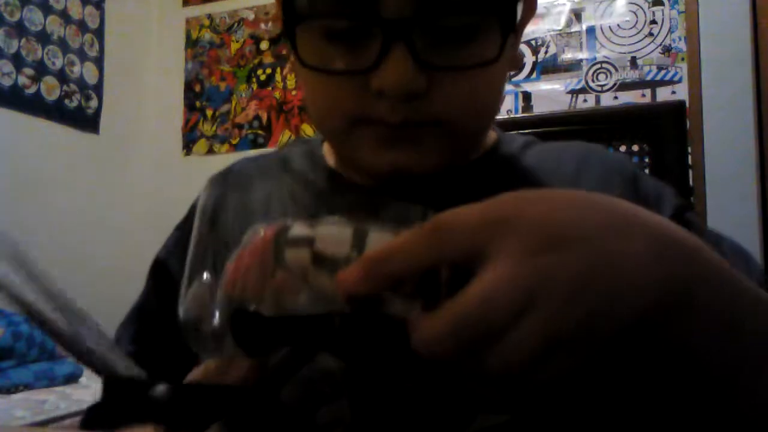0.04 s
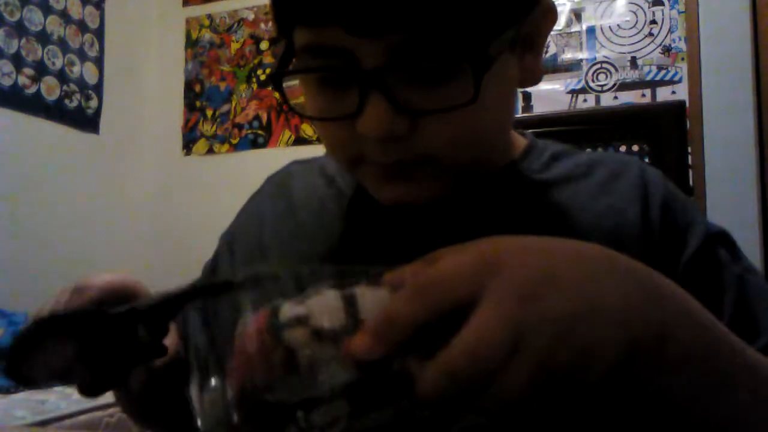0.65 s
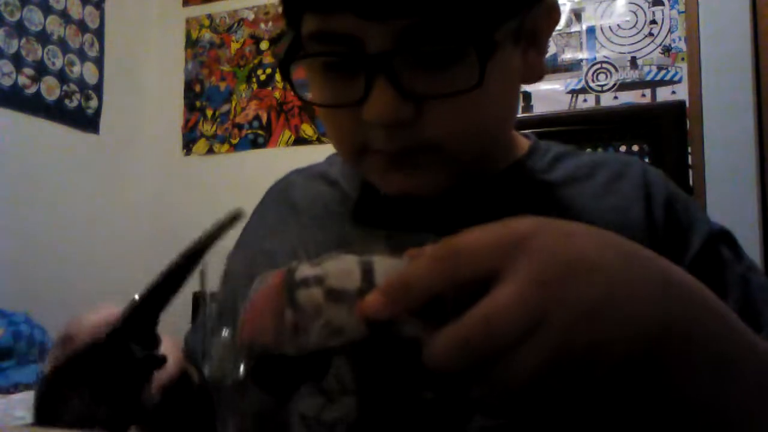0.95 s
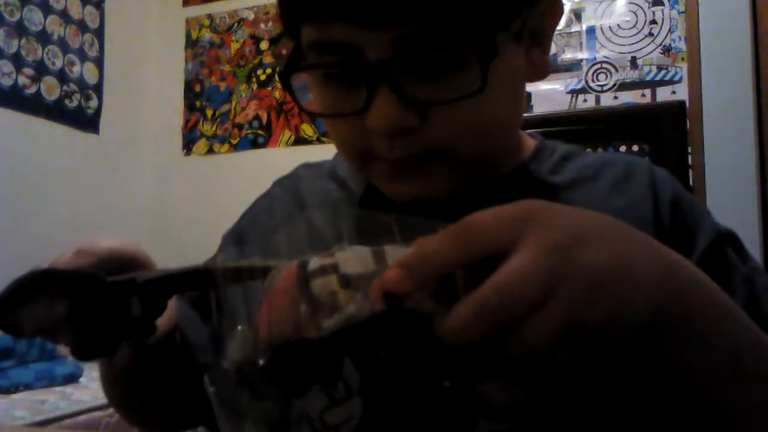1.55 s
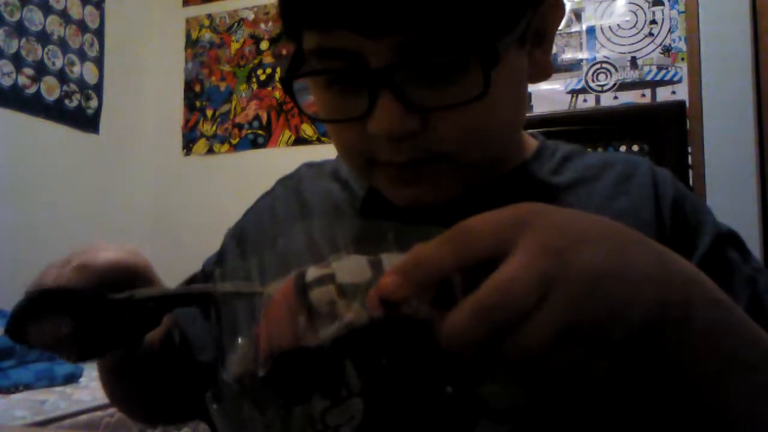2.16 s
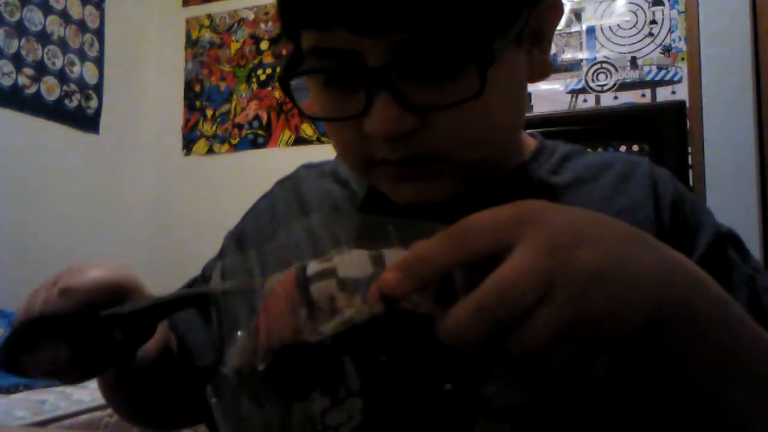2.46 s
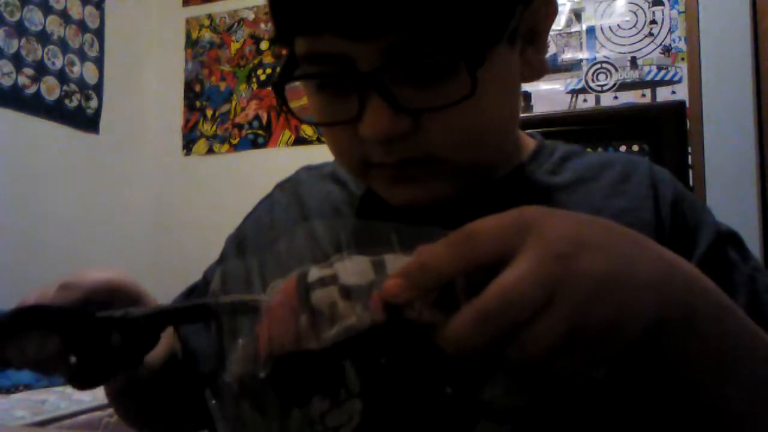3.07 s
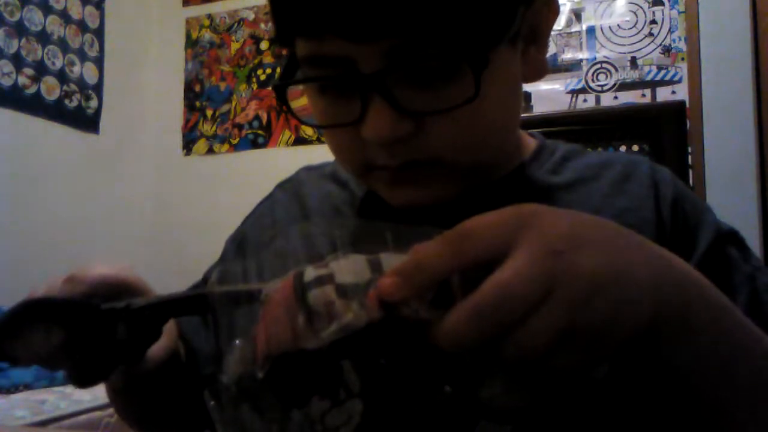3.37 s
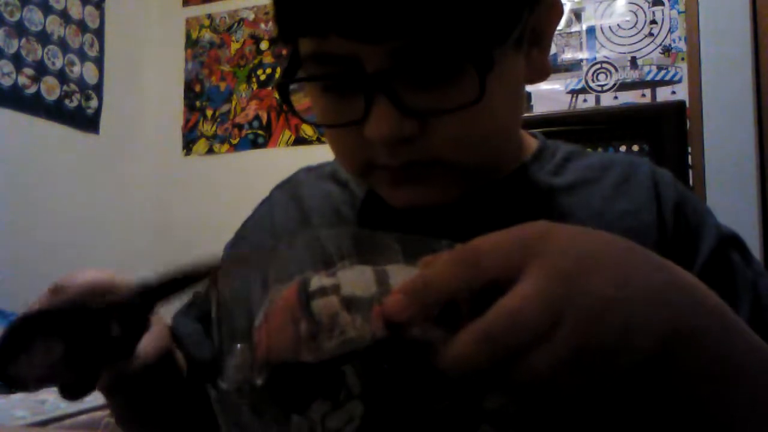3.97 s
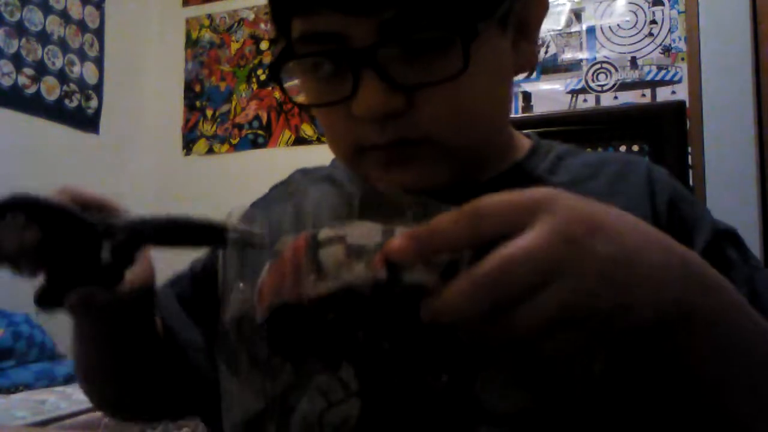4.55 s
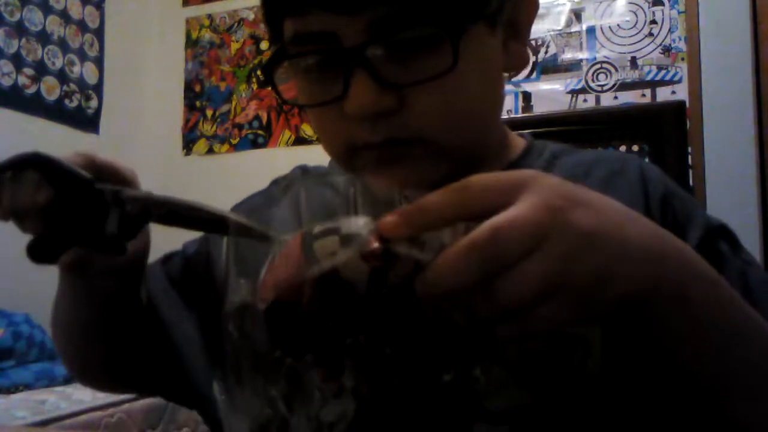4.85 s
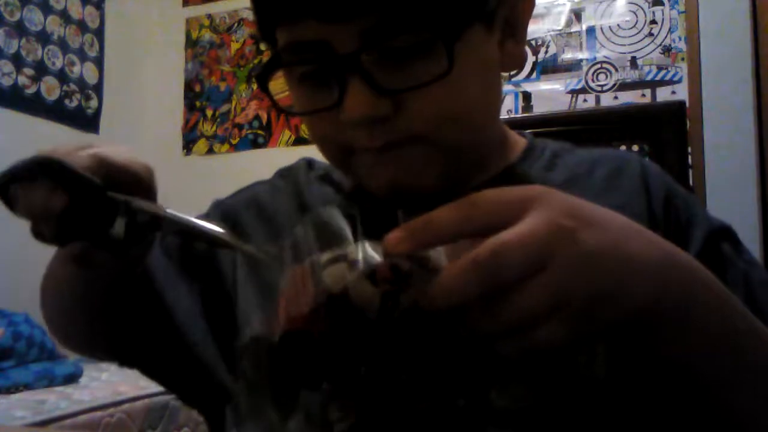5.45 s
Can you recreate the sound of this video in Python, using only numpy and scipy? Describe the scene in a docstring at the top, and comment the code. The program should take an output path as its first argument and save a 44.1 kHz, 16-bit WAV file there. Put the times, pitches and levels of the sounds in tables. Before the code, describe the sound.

Stiff plastic packaging clicks, rubs and crackles up close as scissors cut in, the blades ringing briefly before it cracks loudly.

```python
"""A stiff clear plastic pack is worked open with scissors, close to a laptop microphone in a small bedroom.
The shell buckles in short irregular clicks, rubs under the fingers and finally gives with a loud crack;
the steel blades ring as they knock. The near walls add a short echo. A low mains hum wavers underneath,
and a noise suppressor hushes the pauses."""
import sys
import numpy as np
from scipy import signal
from scipy.fft import rfft, irfft
from scipy.io import wavfile
from scipy.ndimage import uniform_filter1d

SR = 44100
rng = np.random.default_rng(int(sys.argv[2]) if len(sys.argv) > 2 else 0)


def file_out(sig):
    """Save sig as 16-bit WAV at sys.argv[1]."""
    # one column per channel
    cols = np.atleast_2d(sig).T
    # limit, then scale
    lim = np.clip(cols, -1, 1)
    pcm = np.round(lim * 32767).astype(np.int16)
    wavfile.write(sys.argv[1], SR, pcm)


N = 247571
T = np.arange(N) / SR


def undb(db):
    """Decibels to gain."""
    return 10 ** (np.asarray(db) / 20)


def unit(x, size=None):
    """Scale to rms 1 over the first size samples, or over all of x."""
    return x / np.sqrt(np.mean(x[:size] ** 2) + 1e-20)


def add(out, s, x):
    """Mix x in at time s."""
    i = max(int(s * SR), 0)
    out[i:i + len(x)] += x[:max(N - i, 0)]


def along(points, hz):
    """Read (f/Hz, value) points on a log-frequency axis."""
    f, value = np.transpose(points)
    return np.interp(np.log(hz + 1), np.log(f), value)


def colour(x, points):
    """Filter x by a curve of (f/Hz, level/dB) points."""
    hz = np.fft.rfftfreq(len(x), 1 / SR)
    return irfft(rfft(x) * undb(along(points, hz)), len(x))


def resonate(x, hz, width):
    """One resonance, gain 1 at its centre."""
    hz = min(hz, .45 * SR)
    return signal.lfilter(*signal.iirpeak(hz, hz / width, fs=SR), x)


def waver(rate_hz):
    """Random steps, smoothed twice, at rms 1."""
    hold = int(SR / rate_hz)
    steps = np.repeat(rng.standard_normal(N // hold + 1), hold)
    return unit(uniform_filter1d(uniform_filter1d(steps, hold), hold)[:N])


# mains partials, rumble spectrum and hiss spectrum: f/Hz, relative level/dB
HUM = [(59.5, 1.5), (119.5, -4)]
RUMBLE = [(25, -14.5), (58, 0), (100, -6.5), (170, -15), (270, -7), (450, -18), (800, -17.5), (1500, -31.5),
          (4000, -37.5)]
HISS = [(200, 2), (1000, 7), (2500, 5), (5000, -3), (8000, 3.5), (11000, 5.5), (16000, -12.5)]
# fader on the room tone, sinking in the pauses: t/s, level/dB
ROOM_TONE_FADER = [(0, -60), (.8, -60), (.9, -78), (.95, -63.5), (1.07, -64.5), (1.15, -58.5), (1.32, -57),
                   (1.4, -74.5), (1.48, -58), (1.8, -64), (1.9, -81), (1.97, -64), (2.06, -62.5),
                   (2.18, -78.5), (2.25, -59.5), (2.52, -59.5), (2.7, -65.5), (2.95, -58.5), (3.28, -62.5),
                   (3.5, -59), (4.15, -58), (4.26, -63), (4.33, -57)]
def room_tone(hum_db=-7.5, rumble_db=-4.5, hiss_db=-16.5, waver_db=2):
    """Behind the pack, mains hum, rumble and faint hiss swell and sink together; the lows also waver."""
    hum = unit(sum(undb(db) * np.sin(2 * np.pi * (hz * T + rng.random())) for hz, db in HUM))
    rumble = unit(colour(rng.standard_normal(N), RUMBLE))
    hiss = unit(colour(rng.standard_normal(N), HISS))
    lows = (undb(hum_db) * hum + undb(rumble_db) * rumble) * undb(waver_db * waver(rate_hz=16))
    fader_db = np.interp(T, *np.transpose(ROOM_TONE_FADER))
    return (lows + undb(hiss_db) * hiss) * undb(fader_db)


# decay of the bedroom: f/Hz, t60/s
ROOM_T60 = [(200, 0.17), (530, 0.36), (1400, 0.2545), (3700, 0.29), (9700, 0.24), (16000, 0.37)]
# echo against the direct sound at the microphone: f/Hz, level/dB
ECHO_LEVEL = [(100, 1.5), (400, -7), (1000, -5.5), (2000, -2.5), (3700, -10.5), (7000, -5), (10000, -5),
              (16000, -11)]
def bedroom(x, gap_s=0.0056, build_s=0.00097):
    """The near walls answer a few milliseconds late with a short dense tail."""
    t = T[:SR * 3 // 5]
    age = np.maximum(t - gap_s, 0)
    spectrum = rfft(rng.standard_normal(len(t)))
    hz = np.fft.rfftfreq(len(t), 1 / SR)
    edges = np.geomspace(60, 18000, 13)
    tail = 0
    for lo, hi in zip(edges, edges[1:]):
        band = irfft(spectrum * (hz >= lo) * (hz < hi), len(t))
        t60 = along(ROOM_T60, np.sqrt(lo * hi))
        fade = (1 - np.exp(-age / build_s)) * undb(-60 * age / t60)
        tail = tail + band * fade / np.linalg.norm(fade)
    return signal.fftconvolve(x, colour(tail, ECHO_LEVEL))[:N]


# short low bumps at the microphone: t/s, f/Hz, level/dB
LOW_BUMPS = [(0.277, 125.6, -54.5), (.29, 314, -42.5), (1.134, 244, -54), (1.28, 56.7, -63),
             (1.55, 60, -64), (2.228, 195, -64), (2.425, 58, -60), (2.48, 58, -59), (3.005, 56, -64),
             (4.29, 199, -63), (4.3, 330, -54), (5.192, 440, -40), (5.395, 164, -55)]
def low_bumps(cycles=7, width_hz=70):
    """Dull thuds of the handled pack and, near 60 Hz, brief swells of mains hum; each fades in a few cycles."""
    out, t = np.zeros(N), T[:SR // 5]
    for s, hz, db in LOW_BUMPS:
        tone = np.sin(2 * np.pi * hz * t) * undb(-60 * t * hz / cycles)
        add(out, s, undb(db) * unit(resonate(tone, hz, width_hz), SR // 50))
    return out


# blades clashing or grazing near the microphone: t/s, level/dB
KNOCKS = [(1.1, -62), (1.756, -72.5), (2.227, -34), (4.1, -71.5), (4.159, -80.5)]
# modes of the steel: f/Hz, relative level/dB, t60/s
STEEL_MODES = [(4120, -13, .2), (5254, -16, 0.26), (6000, -5, 0.11), (6250, -6, 0.15), (6750, -7.5, .2),
               (7300, -2.5, 0.25), (7700, -3, 0.13), (8700, -4.5, 0.1), (8580, -0.5, 0.092)]
def blades(width_hz=170):
    """The edges grate past each other, so the steel rings roughly as it fades."""
    out, t = np.zeros(N), T[:SR // 2]
    for s, db in KNOCKS:
        ring = sum(undb(mode_db - 60 * t / t60) * resonate(rng.standard_normal(len(t)), hz, width_hz)
                   for hz, mode_db, t60 in STEEL_MODES)
        add(out, s, undb(db) * unit(ring, SR // 50))
    return out


# body, crack, treble and air bands of the plastic: low f/Hz, high f/Hz
BAND_EDGES = [(260, 1300), (1400, 3300), (3800, 8500), (9000, 16000)]
BANDS = [signal.butter(3, edges, btype="bandpass", fs=SR, output="sos") for edges in BAND_EDGES]
def split(x, size):
    """Body, crack, treble and air of x, each at rms 1 over the first size samples."""
    return [unit(signal.sosfilt(sos, x), size) for sos in BANDS]


def balance(bands, body_db, peak_hz, peak_db, skirt_db_per_oct2=5.5, air_db=-0.5):
    """Mix the bands: above the body, a fracture or slip is loudest at its pitch and falls to each side."""
    centres_hz = np.sqrt(np.prod(BAND_EDGES[1:], axis=1))
    octaves = np.log2(centres_hz / peak_hz)
    upper_db = peak_db - skirt_db_per_oct2 * octaves ** 2 + np.array([0, 0, air_db])
    return sum(undb(db) * band for db, band in zip((body_db, *upper_db), bands))


# resonances of the plastic shell: f/Hz, width/Hz, level/dB
SHELL_MODES = [(289, 75, -9), (450.2, 17, -3.5), (521, 18, -6), (670, 120, 0), (788.5, 39, 0.5),
               (889, 160, -6), (1067, 142, 0), (1835, 310, -5), (2159, 300, 4), (2536, 230, -2),
               (2840, 380, -14), (4513, 610, 1), (5177, 480, -1.5), (6410, 220, -9), (7530, 1700, -15.5),
               (12600, 6600, -12.5), (15500, 740, -25)]
def shell(force, blur=1, bend=0.05, place_db=6.5):
    """The pack rings; its bend detunes the modes, the place of the push weights them, blur widens them."""
    chance = rng.standard_normal((len(SHELL_MODES), 2))
    ring = 0
    for (hz, width, db), (detune, weight) in zip(SHELL_MODES, chance):
        mode = resonate(force, hz * (1 + bend * detune), min(blur * width, SR / 10))
        ring = ring + undb(db + place_db * weight) * mode
    return ring


# plastic scraping on fingers and blades: start t/s, end t/s, body level/dB, scrape level/dB
RUBS = [(0, 0.043, -57, -72), (0.175, 0.28, -48.5, -62), (0.254, 0.352, -61, -57), (.445, 0.739, -61, -63),
        (.935, 0.987, -73, -86), (1.102, 1.145, -74, -66), (1.135, 1.16, -47, -57),
        (1.632, 1.809, -73, -84), (1.951, 2.078, -74, -94), (2.47, 2.515, -54, -64),
        (2.508, 2.547, -46, -51), (2.803, 2.835, -57, -56.5), (2.903, 2.945, -60, -69.5),
        (3.563, 3.597, -64.5, -63), (4.451, 4.496, -56, -63), (4.565, 4.743, -60.5, -63),
        (4.696, 4.742, -49, -52), (4.867, 4.9, -54.5, -59), (4.924, 4.973, -56, -62.5),
        (4.98, 5.057, -69.5, -76), (5.281, 5.356, -47.5, -54.5), (5.561, 5.63, -50.5, -50.5)]
def rubs(slips_per_s=1100, slip_hz=3730, spread_db=4, taper=0.16):
    """Stick and slip: a run of uneven little ticks that locks on to the shell's resonances."""
    out = np.zeros(N)
    for start, end, body_db, scrape_db in RUBS:
        n = max(int((end - start) * SR), SR // 100)
        slips = (rng.random(n) < slips_per_s / SR) * rng.choice([-1, 1], n)
        sizes = undb(spread_db * np.minimum(rng.exponential(size=n), 3))
        force = np.pad(slips * sizes * signal.windows.tukey(n, taper), (0, SR // 20))
        ring = shell(shell(force, bend=0.024), blur=1.6, bend=0.028)
        add(out, start, balance(split(ring, n), body_db, slip_hz, scrape_db))
    return out


# squeezes of the pack: start t/s, end t/s, level/dB
SQUEEZES = [(0.182, 0.379, -55.5), (.505, .555, -47), (.595, .64, -49), (0.692, .72, -58.5),
            (4.919, 4.958, -60.5), (5.115, 5.155, -49), (5.211, 5.308, -50)]
def crinkles(per_s=38, ms=1.2, panel_hz=835, fracture_hz=4100, body_db=1.5, spread_db=3, spread_oct=.3):
    """The squeezed pack crinkles: rows of small snaps at uneven moments, varied in size and pitch."""
    rows = []
    for start, end, db in SQUEEZES:
        n = max(round((end - start) * per_s), 1)
        times = start + (end - start) * (np.arange(n) + rng.random(n)) / n
        for s, (size, panel, fracture) in zip(times, rng.standard_normal((n, 3))):
            snap_db = db + spread_db * size
            rows.append((s, ms, panel_hz * 2 ** (spread_oct * panel), snap_db + body_db,
                         fracture_hz * 2 ** (spread_oct * fracture), snap_db))
    return rows


# single snaps of the plastic, close to the microphone:
# t/s, buckling length/ms, panel f/Hz, body level/dB, fracture f/Hz, fracture level/dB
SNAPS = [(.097, 4.6, 796, -42.5, 1950, -43.5), (.1305, 4, 790, -42.5, 2270, -48.5),
         (.167, 1.2, 896, -28.5, 1940, -42), (.25, 1.6, 715, -35.5, 3130, -36.5),
         (.263, 10.8, 680, -37, 2450, -40), (.283, 5, 398, -35, 2190, -41),
         (.4646, 1.6, 1340, -48, 4100, -48), (.493, 2, 780, -48, 2980, -36.5),
         (.585, 3.7, 766, -61, 2113, -43), (.647, 3.6, 840, -47.5, 2600, -69),
         (.682, 2.6, 860, -47.5, 3200, -51.5), (.786, 0.88, 814, -56, 2970, -57),
         (1.125, 4.6, 412, -42.5, 3200, -44.5), (1.1334, 3, 407, -38, 4150, -41),
         (1.4366, 1.3, 790, -45.5, 3820, -47.5), (1.638, 4.3, 806, -62, 2700, -69.5),
         (1.757, 4.4, 970, -76, 3700, -69.5), (2.218, 3.1, 1100, -45, 3480, -42.5),
         (2.225, 4.96, 1070, -35, 4460, -30.5), (2.5096, 1.47, 936, -40, 3780, -37),
         (2.521, 3, 1010, -44, 3830, -40), (2.801, 12.3, 827, -57, 3100, -49.5),
         (3.097, 1.05, 1200, -48, 3870, -38.5), (3.391, 6.2, 833, -46.5, 4100, -43.5),
         (3.6212, 3.1, 990, -49.5, 5640, -39.5), (3.851, .8, 850, -52.5, 2620, -54.5),
         (3.8886, 1.68, 957, -39, 3630, -37), (3.954, 0.59, 1030, -51, 3180, -52.5),
         (4.287, 4.5, 335, -44, 2840, -49.5), (4.305, 4.1, 315, -43.5, 3000, -52.5),
         (4.494, 5.34, 685, -45, 3200, -43.5), (4.51, 2.9, 580, -42, 3280, -46.5),
         (4.67, 3.4, 740, -46.5, 3470, -49.5), (5.059, 3.1, 637, -32.5, 1430, -40.5),
         (5.163, 1.2, 818, -33, 2830, -28), (5.1918, 1.97, 447, -32, 1912, -52),
         (5.2327, 1.6, 1050, -41.5, 4650, -37.5), (5.2535, .6, 1030, -38, 3000, -37),
         (5.3607, 1.42, 544, -22.5, 4500, -13.5), (5.394, 3.1, 640, -27, 4940, -22),
         (5.4005, 1.25, 770, -26, 3320, -27), (5.529, 4.3, 920, -43.5, 4230, -39.5),
         (5.543, 2.3, 817, -41, 4000, -37), (5.5818, 2.4, 1020, -31, 3700, -32.5)]
def snaps(rows, blur, kick=1.6, flutter=0.24, flutter_s=0.0055, strain=0.087, strain_s=0.0018):
    """A crease pops through in a burst of tiny fractures, ringing the shell and the panel that flexes."""
    lead_s = .004
    attack = int((lead_s + .008) * SR)
    out, t = np.zeros(N), T[:SR // 20] - lead_s
    after, before = np.maximum(t, 0), np.minimum(t, 0)
    for s, ms, panel_hz, body_db, fracture_hz, fracture_db in rows:
        age = after * 1000 / ms  # in buckling lengths
        burst = 2 * age * np.exp(1 - 2 * age)
        # the crease creaks as it is strained; then bending waves bounce between the folds
        creak = strain * np.exp(before / strain_s - age)
        bounces = flutter * (1 - np.exp(-age)) * np.exp(-after / flutter_s)
        force = rng.standard_normal(len(t)) * (creak + burst + bounces)
        force[np.argmax(age > .5)] += kick  # at the crest of the burst
        body, *upper = split(shell(force, blur), attack)
        panel = unit(resonate(body, panel_hz, width=100), attack)
        body = unit(body + panel, attack)
        add(out, s - lead_s, balance([body, *upper], body_db, fracture_hz, fracture_db))
    return out


def scene(echoes=2, all_faces_blur=3.7):
    """One face of the pack points at the microphone; the walls hear all faces, their modes blurred."""
    creases = SNAPS + crinkles()
    other_sounds = blades() + rubs() + low_bumps()
    echo = sum(bedroom(snaps(creases, all_faces_blur) + other_sounds) for _ in range(echoes))
    direct = snaps(creases, blur=0.98) + other_sounds
    return (direct + echo / np.sqrt(echoes) + room_tone())[None]


def suppress(x, threshold_db=-67, slope=0.6, depth_db=6, window_s=0.023):
    """The laptop's noise suppressor turns the sound down while the upper bands are quiet."""
    heard = sum(signal.sosfilt(sos, x) for sos in BANDS[1:])
    power = np.abs(uniform_filter1d(heard ** 2, int(window_s * SR)))
    level_db = 10 * np.log10(power + 1e-14)
    cut_db = np.clip(slope * (threshold_db - level_db), 0, depth_db)
    return x * undb(-uniform_filter1d(cut_db, SR // 50))


def record(dry, ceiling=0.45, top_hz=16200):
    """The close laptop microphone rounds the loudest crack, hushes the pauses and cuts the top."""
    rounded = ceiling * np.tanh(dry / ceiling)
    lowpass = signal.ellip(8, .2, 70, top_hz, fs=SR, output="sos")
    return signal.sosfilt(lowpass, suppress(rounded))


dry = scene()
out = record(dry)
file_out(out)
```